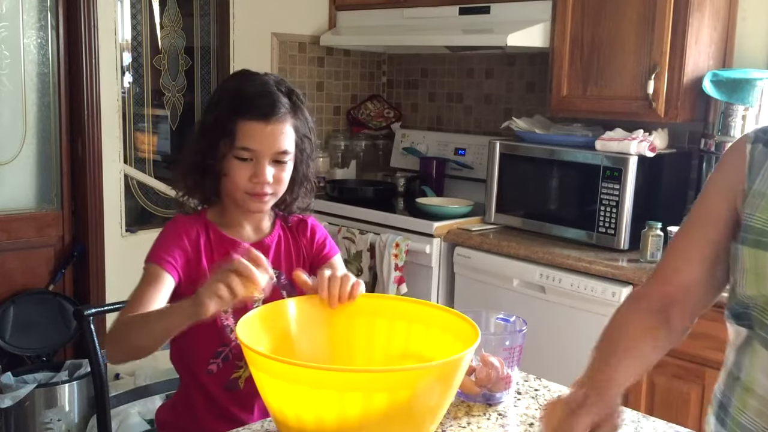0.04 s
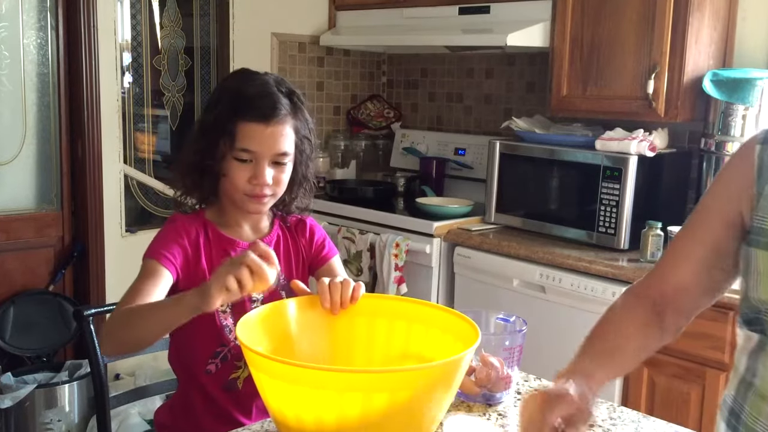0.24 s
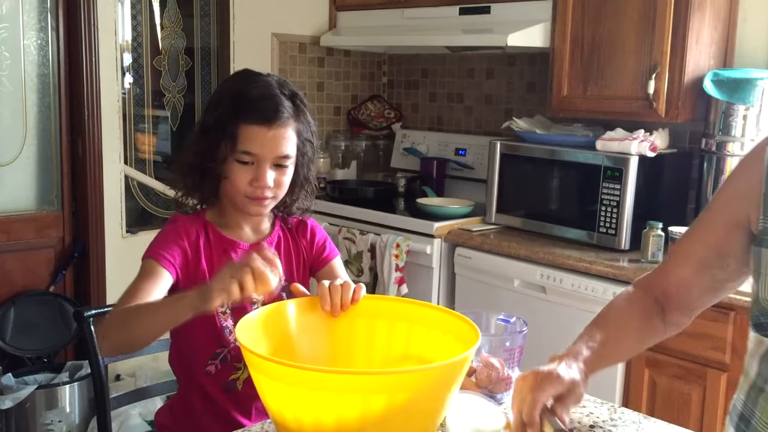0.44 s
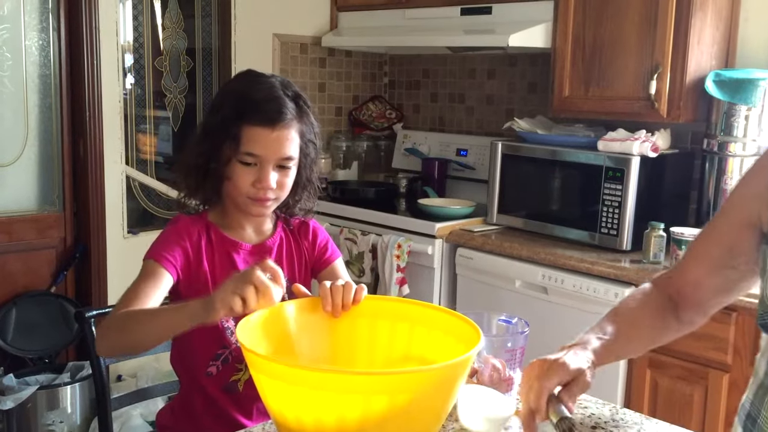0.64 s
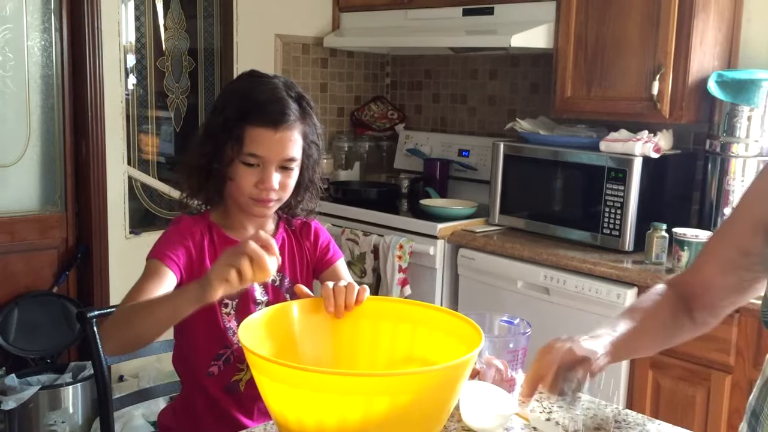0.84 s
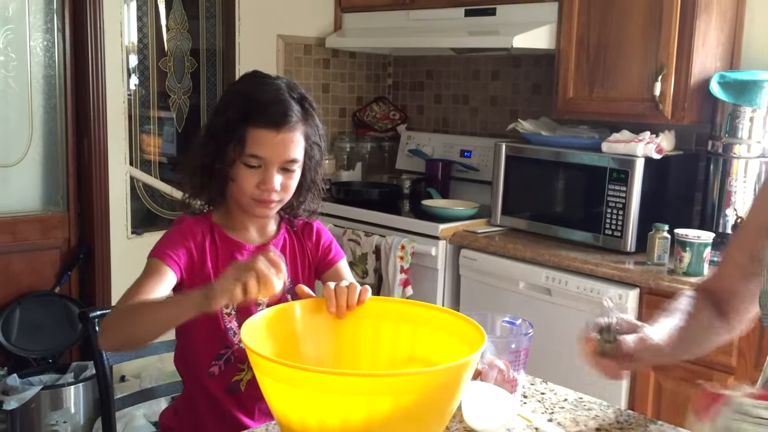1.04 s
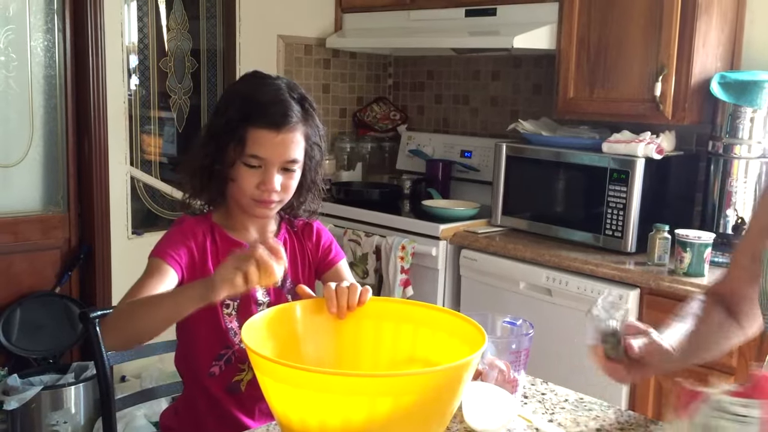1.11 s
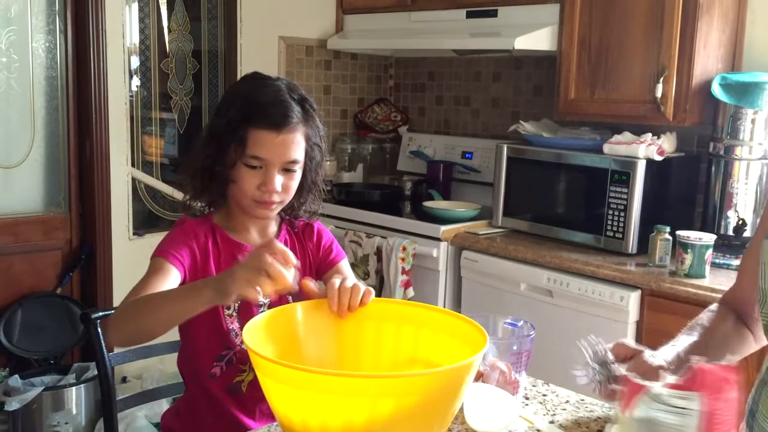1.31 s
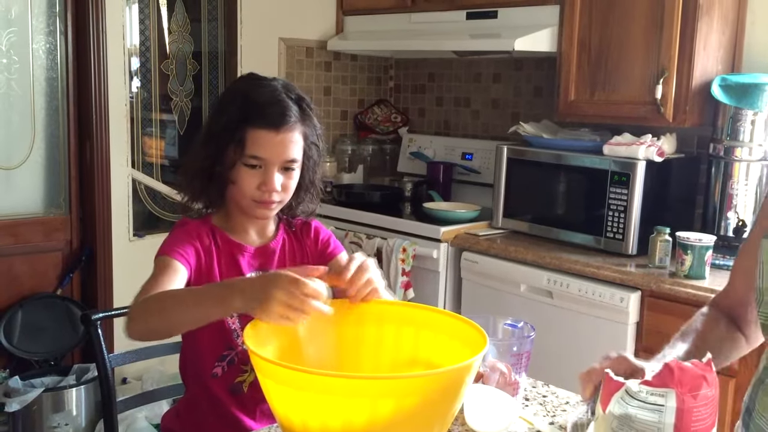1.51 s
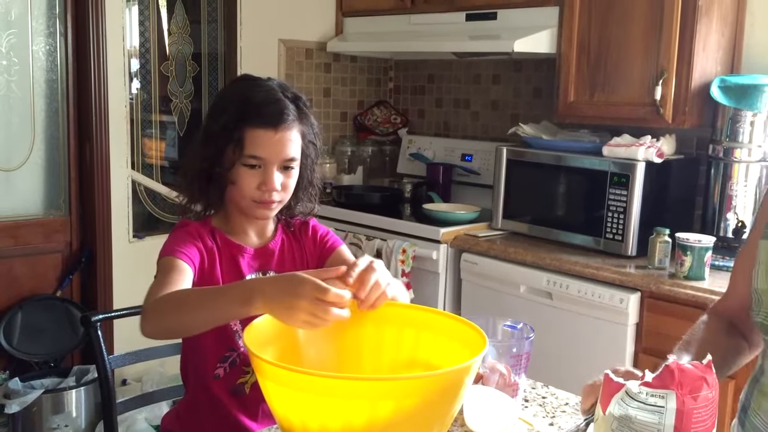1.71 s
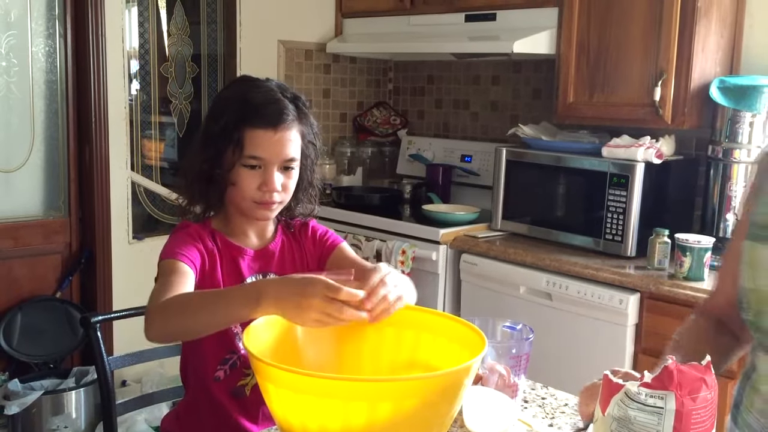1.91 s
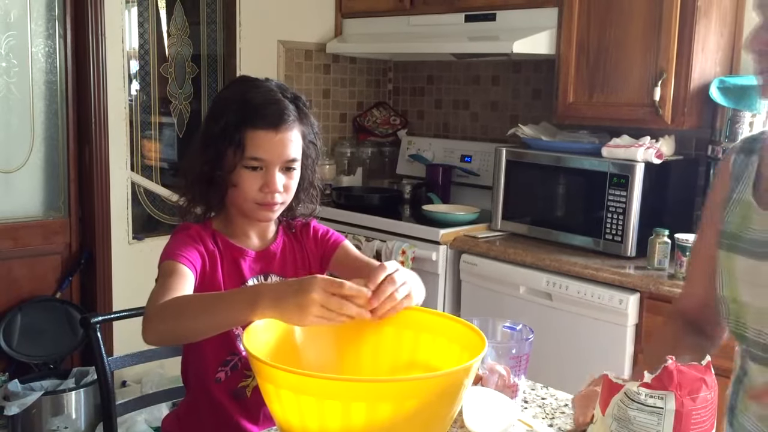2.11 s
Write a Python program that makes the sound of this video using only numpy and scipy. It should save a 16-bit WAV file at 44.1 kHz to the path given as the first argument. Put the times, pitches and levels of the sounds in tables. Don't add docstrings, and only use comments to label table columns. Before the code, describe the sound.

Egg tapped against a plastic bowl with dull bouncing thuds, a crisp shell crack, then faint metal jingle

```python
import sys
import numpy as np
from scipy import signal
from scipy.fft import rfft, irfft
from scipy.io import wavfile
from scipy.ndimage import uniform_filter1d

SR = 44100
rng = np.random.default_rng(int(sys.argv[2]) if len(sys.argv) > 2 else 0)


def boost_factor(decibels):
    exponent = np.asarray(decibels, float) / 20
    return 10 ** exponent


def inscribe(sig):
    pcm = np.round(np.clip(np.atleast_2d(sig).T, -1, 1) * 32767)
    wavfile.write(sys.argv[1], SR, pcm.astype(np.int16))


N = 94815


def clicks(times, db):
    x = np.zeros(N)
    index = np.clip((np.asarray(times) * SR).astype(int), 0, N - 1)
    np.add.at(x, index, boost_factor(np.asarray(db)))
    return x


def decay(t, t60):
    return 1000. ** (-t / t60)


def swell(t, rise):
    return 1 - np.exp(-(t / rise) ** 2)


def ring(x, hz, t60, rise=1e-4):
    t = np.arange(int(SR * .3)) / SR
    shape = swell(t, rise) * decay(t, max(t60, 1e-3))
    return signal.fftconvolve(x, np.sin(2 * np.pi * hz * t) * shape)[:N]


def burst(x, t60):
    t = np.arange(int(SR * .3)) / SR
    envelope = signal.fftconvolve(x, decay(t, max(t60, 1e-3)))[:N]
    return envelope * rng.standard_normal(N)


def table_at(hz, table, column=1):
    points = np.array(table)
    return np.interp(np.log(hz), np.log(points[:, 0]), points[:, column])


def colour(x, table):
    hz = np.fft.rfftfreq(len(x), 1 / SR) + 1
    return irfft(rfft(x) * boost_factor(table_at(hz, table)), len(x))


def walk(rate):
    hold = max(int(SR / rate), 20)
    levels = rng.standard_normal(N // 20 + 1)[:N // hold + 1]
    return uniform_filter1d(np.repeat(levels, hold), hold)[:N]


def unit(x):
    return x / x.std()


# [Hz, dB]
HUM_COLOUR = [(30, -8), (150, -3.5), (330, -8.5), (600, -16), (2000, -23.5), (3000, -23), (8000, -37.5),
              (15000, -50)]


def hum():
    noise = unit(colour(rng.standard_normal(N), HUM_COLOUR))
    return noise * boost_factor(-65.5 + 1.5 * walk(6.7))


# [s, dB]
WALL_ECHOES = [
    (.0045, -9.5),
    (0.0155, -20.5),
    (.039, -21.5),
]
# [Hz, dB, s]
ROOM_TAIL = [(120, -7, 0.59), (240, -4.5, 0.36), (525, -5, 0.36), (915, 0, 0.35), (2000, -4, 0.38),
             (3715, -2.5, 0.2), (7780, -4.5, 0.41), (14000, -14.5, 0.23)]


def reverberant_tail(t):
    tail = 0
    for hz in 100 * 2 ** np.arange(0, 7.5, 1 / 3):
        db, t60 = table_at(hz, ROOM_TAIL, 1), table_at(hz, ROOM_TAIL, 2)
        edges = [hz / 2 ** (1 / 6), hz * 2 ** (1 / 6)]
        sos = signal.butter(2, edges, "band", fs=SR, output="sos")
        band = signal.sosfilt(sos, rng.standard_normal(2 * len(t)))
        envelope = np.sqrt(uniform_filter1d(band ** 2, int(2.7 * SR / hz)))
        even = (band / envelope * band.std())[len(t):]
        fall = decay(t, t60)
        tail = tail + even * fall * boost_factor(db) / np.sqrt(np.sum(fall ** 2))
    patchy_db = 1.6 * walk(150)[:len(t)]
    return tail * (1 - np.exp(-t / 0.0045)) * boost_factor(patchy_db)


def kitchen(x, wet_db):
    t = np.arange(SR // 2) / SR
    tail = reverberant_tail(t)
    walls = clicks(*np.array(WALL_ECHOES).T)[:len(t)]
    dull = signal.butter(2, 800, fs=SR, output="sos")
    cupboard = signal.sosfilt(dull, clicks([.02], [-8.5]))[:len(t)]
    return x + boost_factor(wet_db) * signal.fftconvolve(x, tail + walls + cupboard)[:N]


def grains(table, curve, grain_db, flutter_db, rate):
    level_db = grain_db * rng.exponential(size=N) + flutter_db * walk(rate)
    x = rng.standard_normal(N) * boost_factor(level_db)
    flow_db = np.interp(np.arange(N) / SR, *np.array(curve).T)
    return unit(colour(x, table)) * boost_factor(flow_db)


# [s, dB]
POUR_FLOW = [(.2, -76.5), (.27, -60), (0.399, -67), (0.428, -55.5), (0.569, -63), (0.619, -85),
             (0.719, -68), (.76, -54), (1.0, -51), (1.302, -49), (1.5, -52), (1.64, -62), (1.70, -68.5),
             (1.96, -72), (2.02, -64), (2.041, -48), (2.15, -54)]
# [Hz, dB]
SUGAR_COLOUR = [(1800, -26.5), (3000, -2.5), (4000, -4.5), (8000, -5.5), (11000, -8), (15000, -4)]
# [s, dB]
SCRAPE_FLOW = [(0, -82), (.2, -76.5), (.36, -58.5), (.72, -59.5), (1.0, -56), (1.05, -52), (1.3, -52.5),
               (1.5, -57), (1.56, -55), (1.6, -57), (1.635, -57.5), (1.65, -52.5), (1.74, -68), (1.96, -74),
               (2.001, -55), (2.15, -51.5)]
# [Hz, dB]
SCOOP_COLOUR = [(350, -50.5), (600, -24), (815, -36), (982, -9.5), (1870, -2), (2360, 0), (3300, -22),
                (4290, -38.5), (7260, -120)]


def sugar():
    pour = grains(SUGAR_COLOUR, POUR_FLOW, grain_db=1.6, flutter_db=1.1, rate=40.16)
    scrape = grains(SCOOP_COLOUR, SCRAPE_FLOW, grain_db=1.3, flutter_db=1.7, rate=90)
    return pour + scrape


# [s, dB, dB]
SPOON_TOUCHES = [(2.029, -40, -44), (2.032, -37.5, -39), (2.036, -32.5, -57), (2.039, -46, -47),
                 (2.045, -41.5, -67), (2.052, -69, -60.5), (2.094, -54, -39.5), (2.099, -64, -38.5),
                 (2.104, -62, -49), (2.110, -47, -54), (2.117, -43, -55), (2.146, -55, -41.5)]
# [Hz, dB, s]
SPOON_MODES = [
    [(655, -14.5, 0.29), (1108, -7.5, 0.089), (2000, -5, 0.033), (2563, -31, 0.06), (4590, -11.5, 0.18),
     (7500, -15, 0.061), (8300, -31, 0.035), (8580, -7, 0.063), (8765, -1, 0.076), (9440, 1.5, 0.12),
     (9860, -6, 0.042), (11700, 0.5, 0.069), (12900, -8, 0.037), (13430, -3, 0.03)],
    [(675, -7, 0.15), (1133, 1.5, 0.07), (1643, 2.5, .1), (3790, -9, 0.061), (5530, -5, 0.067),
     (6380, -6, 0.15), (6770, -1, 0.059), (8400, -4.5, 0.083), (8900, -30, .05), (8900, 0, 0.062),
     (10200, -4, 0.067), (11400, 1, 0.044), (12200, -6, .04), (14520, 4, .03)],
]
# [Hz, dB]
RASP_COLOUR = [(1000, -8), (7000, -4.5), (8200, 2), (9800, -0.5), (10800, 2), (12000, 7), (15500, -2)]


def spoons():
    s, *spoon_dbs = np.array(SPOON_TOUCHES).T
    rings = 0
    for touch_db, modes in zip(spoon_dbs, SPOON_MODES):
        for hz, mode_db, t60 in modes:
            scatter_db = 3 * rng.standard_normal(len(s))
            tone = ring(clicks(s, touch_db + mode_db - 5.5 + scatter_db), hz, t60)
            rattle_db = 2.5 * walk(300 * (.2 + hz / 9000))
            rings = rings + tone * boost_factor(rattle_db)
    rasp = burst(clicks(s, np.maximum(*spoon_dbs) - 4.5), 0.096)
    return rings + colour(rasp, RASP_COLOUR)


# [s, dB, Hz]
TICKS = [(0.063, -87, 8550), (0.223, -38.5, 2750), (0.249, -44, 9100), (0.2745, -35.5, 8400),
         (0.358, -46, 8100), (0.415, -30.5, 8700), (0.4153, -42, 2080), (0.4157, -28.5, 1250),
         (0.4327, -35, 8700), (.467, -39, 8300), (0.495, -38, 8300), (0.5343, -28.5, 2770),
         (.542, -36, 2760), (0.75, -31, 6830), (.829, -37, 8700), (1.0616, -9.5, 2613),
         (1.067, -20, 10800), (1.269, -40.5, 7170), (1.355, -35, 2150), (1.3851, -36, 2900),
         (1.41, -44, 3400), (1.47, -38.5, 2370), (1.519, -46.5, 1413), (1.574, -38, 2000),
         (1.576, -45, 6760), (1.6124, -38.5, 2326), (1.615, -44, 6250), (1.642, -38, 1868),
         (1.644, -38.5, 6330), (1.817, -46.5, 4910), (1.872, -42.5, 1870)]


def ticks():
    rings = 0
    for s, db, hz in TICKS:
        rings = rings + ring(clicks([s], [db - 0.5]), hz, t60=26 / hz, rise=1 / hz)
    s, db, _ = np.array(TICKS).T
    snap = burst(clicks(s, db - 14), .006)
    return rings + np.diff(snap, prepend=0)


# [Hz, dB, s]
BOWL_MODES = [(222.2, -15.5, 0.047), (296, -15.5, 0.028), (394, 3, 0.019), (460.4, 2, 0.02),
              (523, 1, 0.024), (602, -10.5, 0.011), (705, -19, 0.0082)]


def bowl(s, db):
    lag_s, rise_s = 0.0014, 0.0019
    hits = clicks(s + lag_s, db)
    body = sum(boost_factor(g) * ring(hits, hz, t60, rise_s) for hz, g, t60 in BOWL_MODES)
    return signal.sosfilt(signal.butter(2, 170, "high", fs=SR, output="sos"), body)


# [Hz, dB, s]
COUNTER_MODES = [(64, -39.5, 0.22), (89.3, -32, 0.19), (130.4, -28.5, 0.22), (218.8, -20, 0.19)]


def counter(s, db):
    hits = clicks(s, db)
    return sum(boost_factor(g) * ring(hits, hz, t60, rise=0.026) for hz, g, t60 in COUNTER_MODES)


# [ratio, dB, s]
RIM_MODES = [(.5, -9, 0.012), (.75, 0.5, 0.01), (1.0, 6, 0.0072), (1.27, 3, 0.0063), (1.6, -8, 0.0084),
             (2.1, -15, 0.005)]


def rim(s, db, pitch_hz):
    scatter_db = 2.5 * rng.standard_normal((len(s), len(RIM_MODES)))
    out = np.zeros(N + 2000)
    t = np.arange(2000) / SR
    for j in range(len(s)):
        start = int(s[j] * SR)
        for k, (multiple, mode_db, t60) in enumerate(RIM_MODES):
            gain = (-1) ** k * boost_factor(db[j] + mode_db + scatter_db[j, k])
            shape = swell(t, 0.0004) * decay(t, t60)
            out[start:start + len(t)] += gain * shape * np.sin(2 * np.pi * multiple * pitch_hz[j] * t)
    return out[:N]


# [Hz, dB, s]
SHELL_MODES = [(3440, 5.5, 0.0026), (4290, 8, 0.0017), (5550, 2.5, 0.0021), (8700, -1, 0.0021),
               (13500, 6, 0.00089)]


def shell(s, db):
    crack = burst(clicks(s, db - 16.5), .008)
    crunch = burst(clicks(s, db - 18.5 - 19), 0.29)
    return sum(boost_factor(g) * ring(crack + crunch, hz, t60) for hz, g, t60 in SHELL_MODES)


# [s, dB, dB, dB, Hz]
EGG_KNOCKS = [(0.217, -36, -58, -70, 1680), (0.2269, -5.5, -17.5, -36, 1715),
              (0.4161, -51, -31, -36.5, 1890), (0.4294, -35, -23, -37.5, 1490),
              (0.4329, -44.5, -28, -53.5, 1590), (0.4448, -62, -42.5, -60, 1550),
              (0.4769, -30, -55.5, -73, 1610), (0.4857, -8, -15.5, -49, 1500),
              (.5325, -11, -25, -49.5, 1330), (0.5338, -32, -19, -38, 1280),
              (0.5379, -28, -25, -58.5, 1425), (.543, -27.5, -23.5, -56, 1511),
              (.5462, -26, -22.5, -56, 1740), (0.7424, -53, -40, -41.5, 1400),
              (.752, -30, -60.5, -59.5, 1510), (0.76, -27, -43.5, -32, 2300),
              (0.7665, -4.5, -9.5, -30.5, 1754), (0.815, -11, -21, -45.5, 1700),
              (0.8161, -26.5, -18.5, -38.5, 1400), (.826, -23, -25.5, -51.5, 1630),
              (0.8376, -30, -22.5, -39.5, 1670), (1.0598, -11.5, -5.5, -14, 1698),
              (1.064, -39.5, -17, -23.5, 1205), (1.0731, -41, -19, -33, 1600),
              (1.999, -66.5, -57.5, -59, 1790), (2.0098, -47, -40, -59, 1850),
              (2.0119, -46, -33.5, -41, 2000), (2.0935, -49, -40.5, -85, 1920)]


def knocks():
    s, body_db, rim_db, shell_db, rim_hz = np.array(EGG_KNOCKS).T
    return bowl(s, body_db) + counter(s, body_db) + rim(s, rim_db, rim_hz) + shell(s, shell_db)


def scene():
    egg = kitchen(knocks() + ticks(), 0)
    jingle = kitchen(spoons(), -3)
    return (egg + jingle + sugar() + hum())[None]


def band_limit(x):
    return signal.sosfilt(signal.butter(12, 16480, fs=SR, output="sos"), x)


# [Hz, dB]
MIC_RESPONSE = [(20, -46), (60, -0.5), (150, 2), (7500, 0), (8700, 3.5), (9800, 1), (11000, -3.5),
                (14000, -3.5)]


def record(dry):
    ceiling = 1.3
    soft = ceiling * np.tanh(colour(dry[0], MIC_RESPONSE) / ceiling)
    top_cut = signal.ellip(10, .2, 60, 15600, fs=SR, output="sos")
    mix = signal.sosfilt(top_cut, soft)[None]
    return band_limit(mix)


dry = scene()
out = record(dry)
inscribe(out)
```